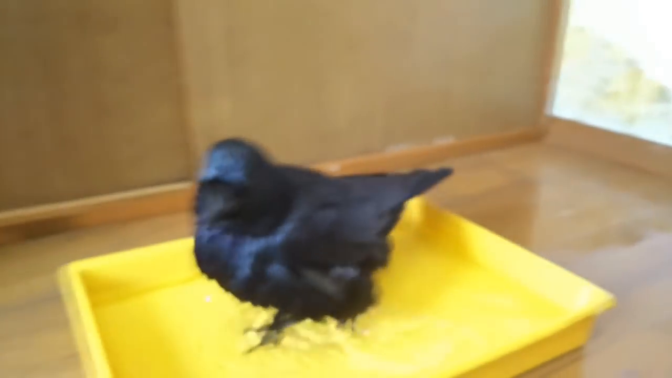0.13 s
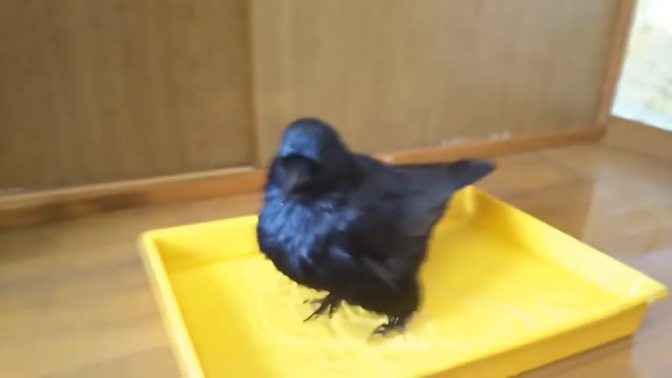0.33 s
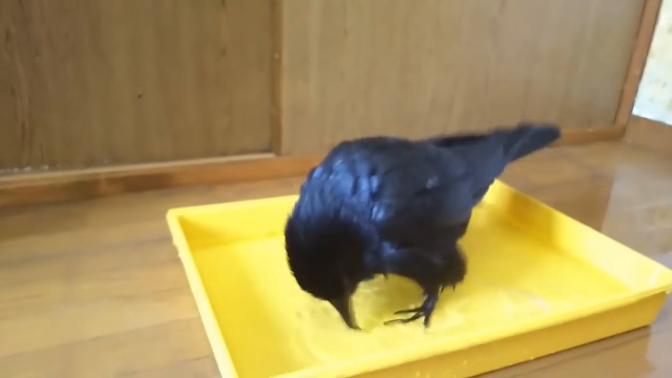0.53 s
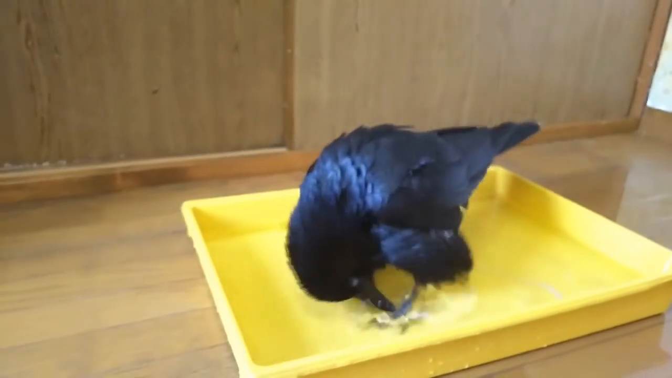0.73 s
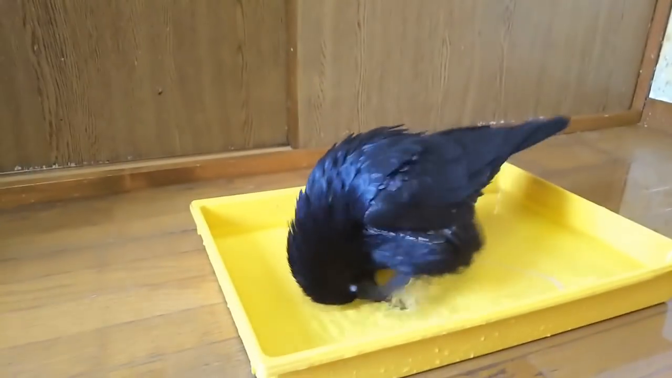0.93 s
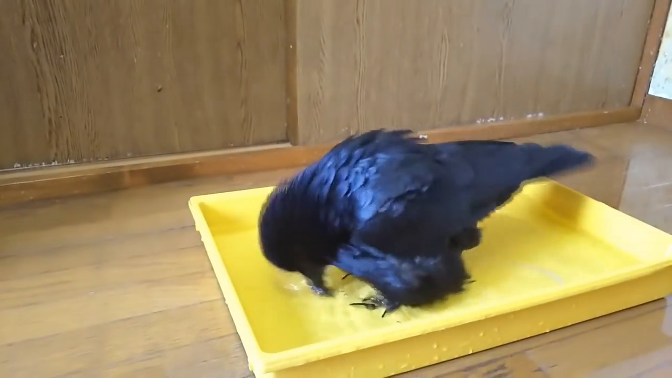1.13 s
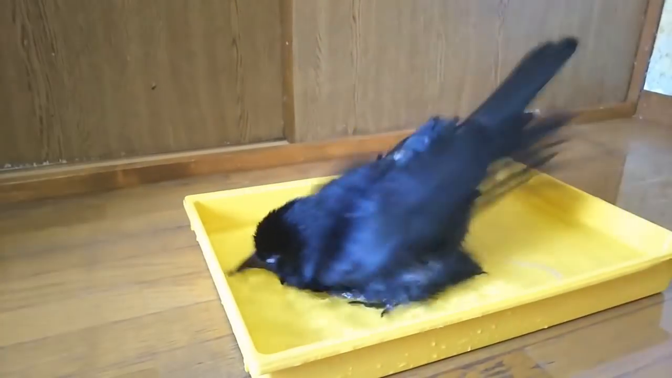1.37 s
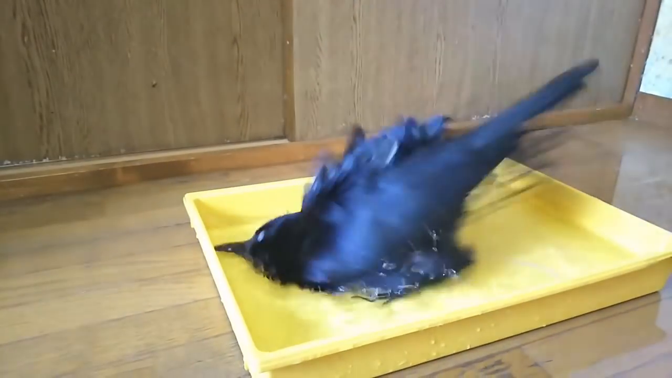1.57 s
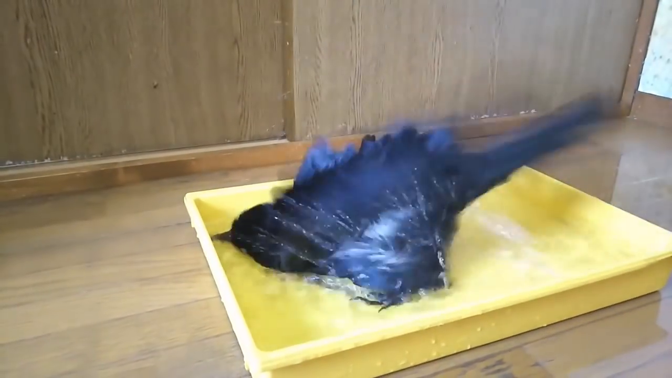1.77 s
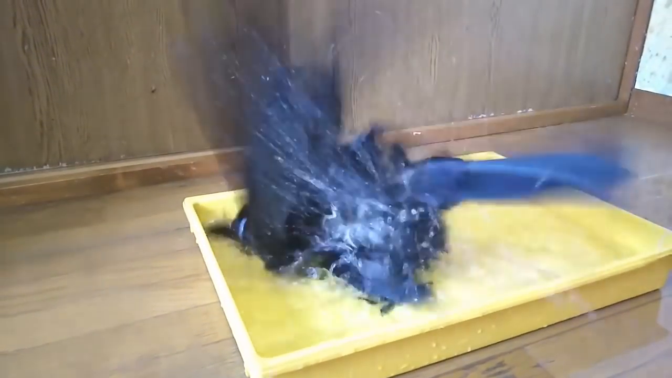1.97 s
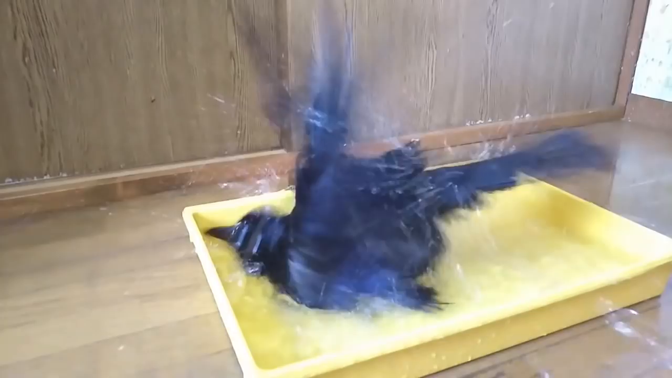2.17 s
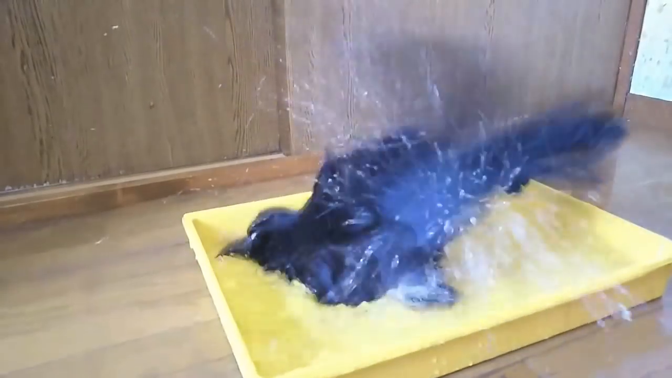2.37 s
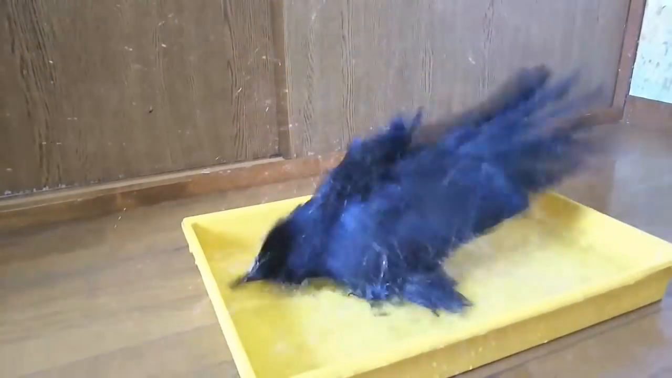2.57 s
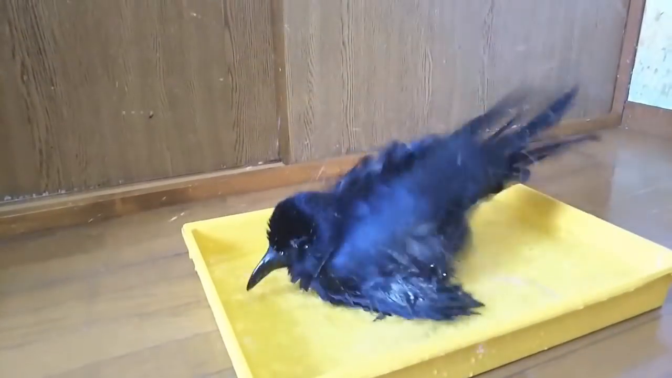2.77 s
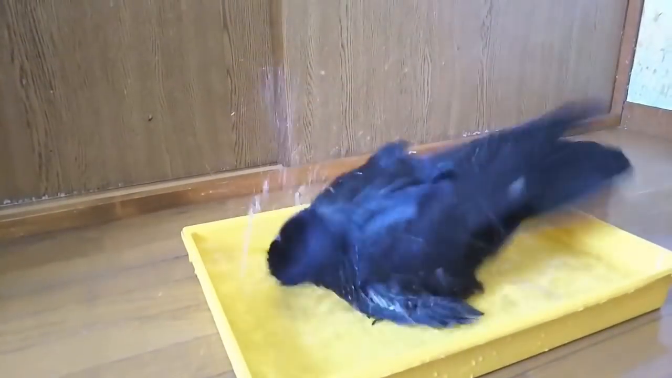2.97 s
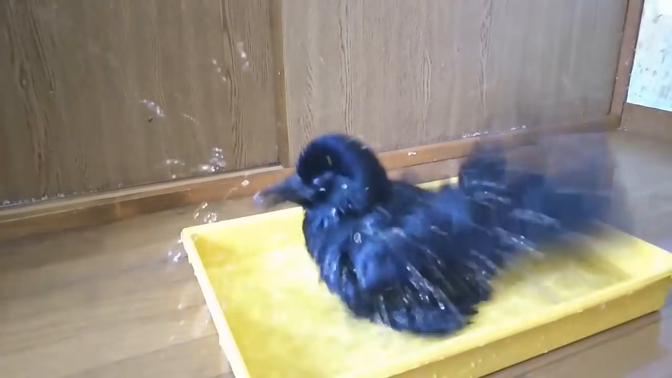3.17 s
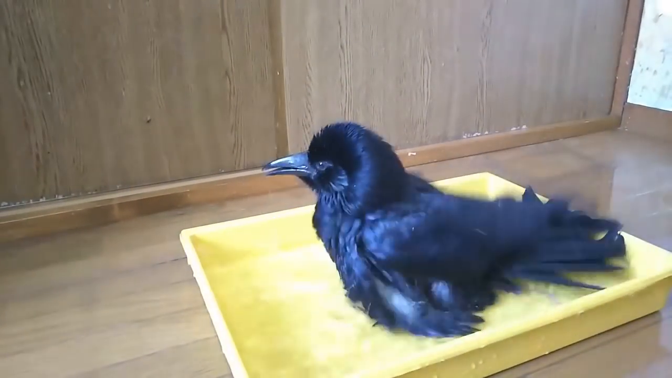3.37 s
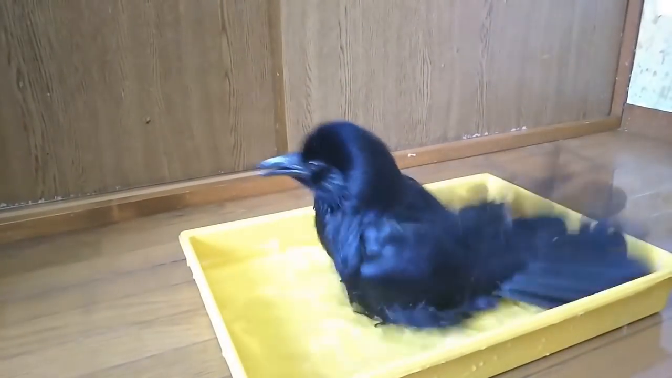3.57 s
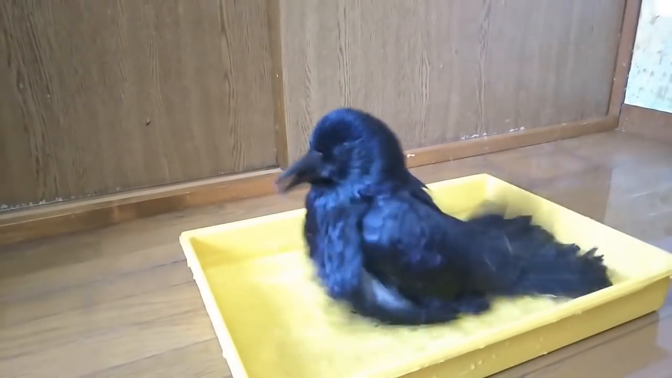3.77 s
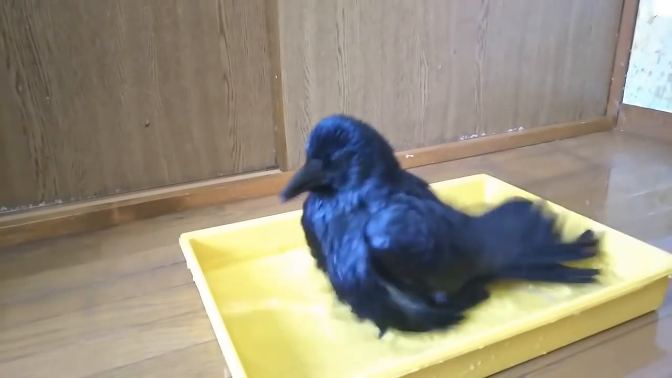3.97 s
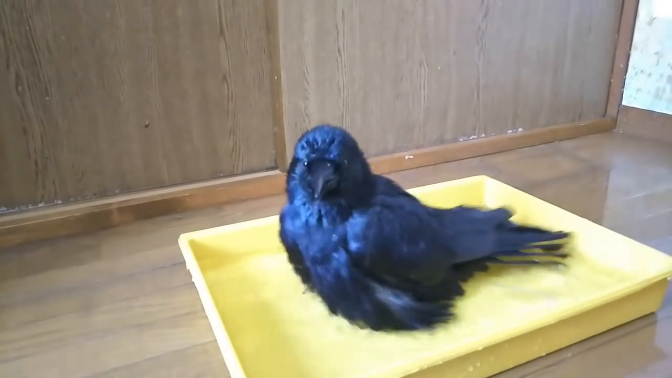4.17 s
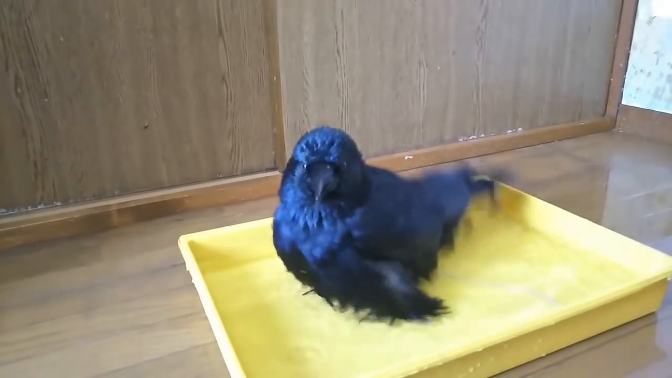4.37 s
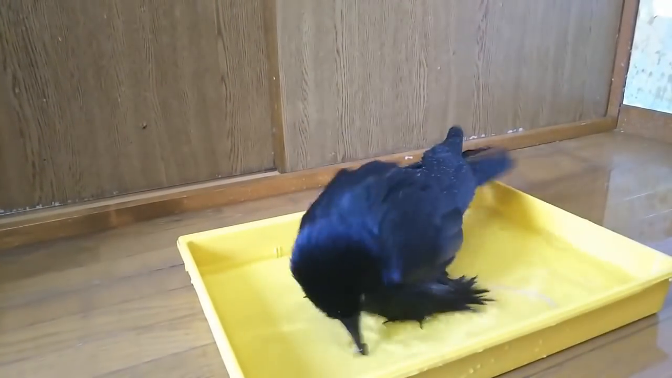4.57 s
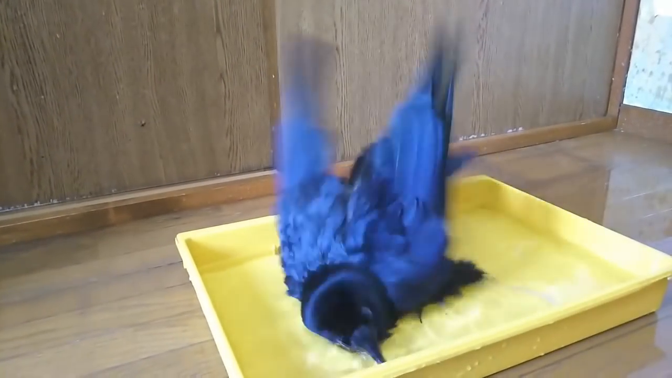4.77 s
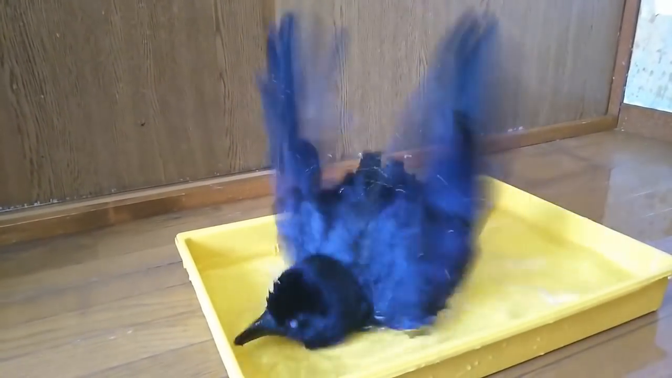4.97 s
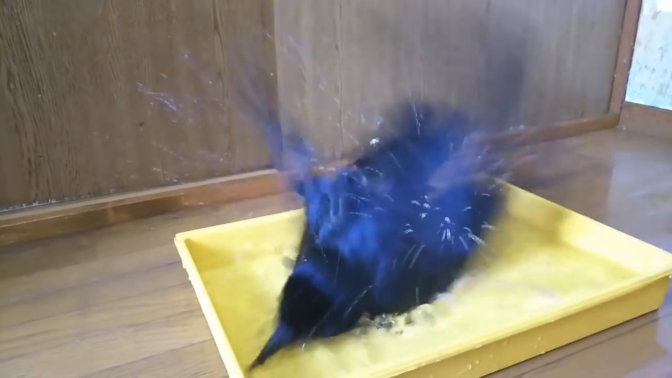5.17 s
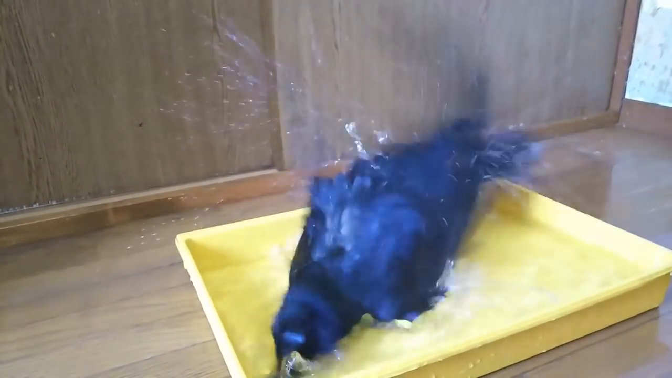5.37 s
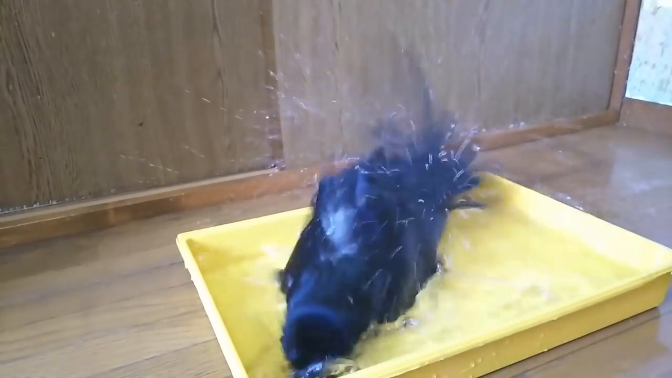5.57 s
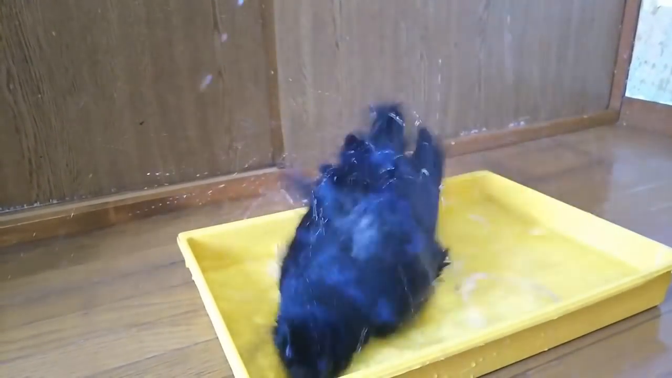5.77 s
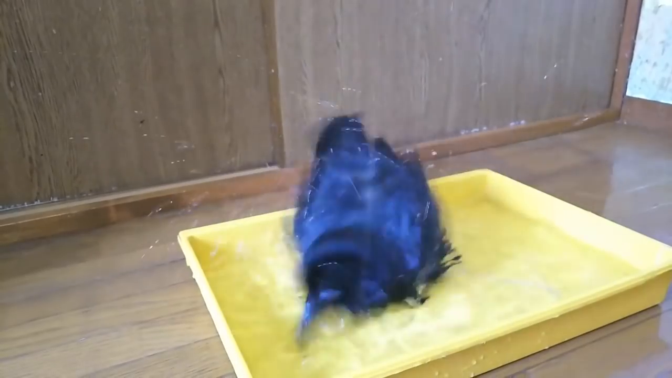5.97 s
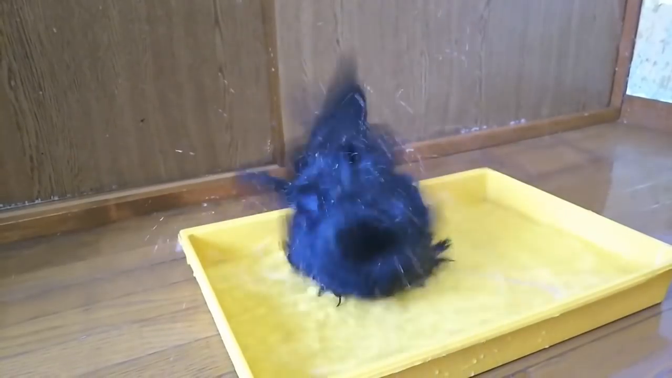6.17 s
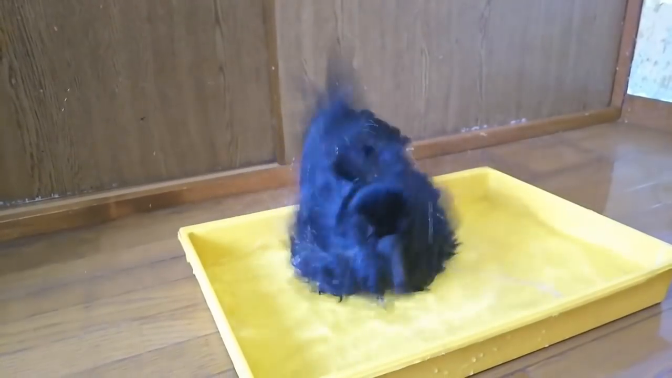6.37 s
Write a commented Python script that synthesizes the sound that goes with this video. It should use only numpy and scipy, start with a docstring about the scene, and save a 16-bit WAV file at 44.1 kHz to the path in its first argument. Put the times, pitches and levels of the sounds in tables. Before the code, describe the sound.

A large bird bathes in a shallow plastic tray indoors: sharp wet smacks, tray knocks, deep wing flutters, spattering spray and bubbles in two vigorous bouts.

```python
"""A crow-sized bird bathes in a shallow plastic tray on a wooden floor in a small bare room.
Feathers and beak smack water and tray: shaped noise bursts. Wing beats push air into the room's low modes
and thump the water. Random drops make spray and slosh, dying sines make the bubbles that ping and gurgle.
The room answers with a tail that swells late; a quiet hush lies below, all heard through two microphone ports."""
import sys
import numpy as np
from scipy import signal
from scipy.fft import rfft, irfft, next_fast_len
from scipy.io import wavfile
from scipy.ndimage import uniform_filter1d

SR = 44100
rng = np.random.default_rng(int(sys.argv[2]) if len(sys.argv) > 2 else 0)


def store_wav(level_fs):
    """Save 16-bit WAV to argv[1]."""
    pcm = np.round(np.clip(np.atleast_2d(level_fs), -1, 1) * 32767)
    wavfile.write(sys.argv[1], SR, pcm.T.astype(np.int16))


N = 282681

# Smacks on water and tray. Each row: start in seconds, length in seconds, crack level in dB, crack centre in Hz,
# slap level in dB, tray knock level in dB, knock centre in Hz. Levels are relative peaks.
SMACKS = [(0.052, 0.0016, -24, 6600, -50, -62, 700), (0.088, 0.0018, -29, 4760, -31, -58, 700),
          (0.0894, 0.0042, -18, 7400, -48, -40, 820), (0.115, .002, -41, 7500, -56, -54, 700),
          (0.14, 0.0036, -12.5, 6640, -51, -45, 700), (.3416, 0.0027, -40, 6750, -52, -72, 700),
          (0.504, 0.0037, -34.5, 7600, -39.5, -61, 700), (0.515, 0.0033, -48, 8150, -45, -57, 700),
          (0.751, 0.0021, -60, 6040, -53, -44, 506), (0.856, 0.0019, -22, 8100, -34, -38, 585),
          (1.061, 0.0028, -31, 5000, -31, -32, 680), (1.1242, 0.0023, -6.5, 6860, -62, -34, 667),
          (1.392, 0.0023, -42, 6070, -48, -65, 700), (1.4237, 0.0036, -33, 6500, -44, -48, 700),
          (1.4689, 0.002, -19.5, 6450, -13, -10.5, 530), (1.6534, 0.0034, -52, 7580, -55, -28, 740),
          (1.835, 0.0028, -28.5, 6730, -28.5, -33, 350), (1.933, 0.0013, -16, 7200, -20, -20.5, 810),
          (2.279, .003, -18.5, 8500, -18, -37, 800), (2.2837, .003, -22, 8000, -33, -43, 800),
          (2.2855, .004, -18, 8000, -21.5, -38, 800), (2.543, 0.0034, -13, 8400, -15, -18.5, 744),
          (2.7254, 0.0072, -14, 8500, -15, -21.5, 850), (2.8797, 0.0034, -21, 7200, -20.5, -27, 744),
          (3.164, 0.0037, -16, 9900, -55, -70, 700), (3.413, 0.011, -35, 4970, -31.5, -65, 704),
          (3.48, 0.0038, -27.5, 7800, -24, -25, 866), (3.6072, 0.0078, -45, 7700, -28.5, -26, 915),
          (3.902, 0.0043, -23, 8000, -24, -23, 606), (4.104, 0.0014, -34, 5060, -29, -48, 700),
          (4.171, 0.0012, -11.5, 6800, -45, -49, 700), (4.231, 0.0049, -29.5, 7000, -52, -62, 700),
          (4.584, 0.0037, -42, 4960, -52, -70, 700), (4.595, 0.0015, -26, 9400, -55, -73, 700),
          (4.617, .005, -29, 8300, -33, -52, 700), (4.622, 0.0043, -30, 7900, -35, -43, 700),
          (4.726, 0.002, -24, 6800, -24, -17.5, 506), (4.8348, 0.0024, -34, 8500, -34, -26, 500),
          (4.995, 0.0023, -26, 7400, -43, -21.5, 580), (5.098, 0.0037, -29.5, 7950, -50, -61, 700),
          (5.1274, 0.0054, -20, 7250, -25, -21.5, 680), (5.283, 0.0036, -24.5, 7650, -52, -54, 700),
          (5.339, 0.00095, -43, 4960, -14, -14, 1080), (5.503, 0.0032, -25, 8340, -44, -32, 700),
          (5.546, 0.0052, -11.5, 7900, -18.5, -23, 700), (5.74, 0.0098, -22.5, 9200, -24.5, -42, 750),
          (5.801, 0.0037, -44, 7000, -47, -32, 600), (5.8522, 0.0012, -45, 6810, -36, -9.5, 695),
          (5.889, 0.003, -17, 8600, -30, -38, 550), (5.9, .003, -20, 8000, -27, -35, 700),
          (6.075, 0.006, -17.5, 8000, -39, -34, 695), (6.192, 0.0033, -27, 8000, -40, -38, 700)]
# Strokes of wings and body. Each row: start in seconds, deep push in dB, water thump in dB, thump centre in Hz,
# spray in dB. Levels are relative.
BEATS = [(0.0, -19.5, -30, 183, -75), (0.497, -42, -54, 221, -63), (.751, -42, -43, 343, -85),
         (0.857, -41, -45.5, 300, -42), (1.06, -73, -44, 300, -56), (1.121, -37, -40, 253, -33.5),
         (1.467, -61, -26, 404, -77), (1.641, -32, -35, 193, -45.5), (1.838, -56, -32.5, 228, -46),
         (1.934, -62, -40, 330, -59), (2.014, -21.5, -30.5, 204, -39), (2.18, -19, -31, 179, -33),
         (2.333, -24, -27.5, 145, -32.5), (2.384, -44, -42, 190, -33), (2.523, -19.5, -27, 204, -28.5),
         (2.685, -31, -33.5, 198, -44), (2.719, -25.5, -27.5, 250, -51), (2.865, -29, -31.5, 197, -37.5),
         (2.878, -62, -49, 300, -39), (3.039, -33, -40, 177, -43.5), (3.156, -29.5, -39, 166, -49),
         (3.29, -36, -48.5, 230, -42), (3.354, -42, -47.5, 230, -64), (3.412, -39, -62, 250, -47.5),
         (3.454, -40, -40, 326, -45), (3.585, -34, -36.5, 196, -43), (3.724, -34, -38, 256, -41.5),
         (3.899, -65, -34.5, 290, -37.5), (4.088, -56, -66, 200, -45), (4.236, -60, -53, 300, -42),
         (4.175, -57, -76, 180, -42.5), (4.266, -42, -37, 277, -63), (4.591, -44, -59, 240, -47),
         (4.726, -17, -28, 224, -70), (4.833, -60, -35.5, 288, -84), (4.997, -32, -36.5, 203, -42),
         (5.129, -24, -30.5, 193, -48.5), (5.174, -28, -35.5, 240, -36), (5.33, -21, -29.5, 179, -31.5),
         (5.515, -16.5, -34, 207, -38), (5.718, -22, -28.5, 161, -38), (5.735, -40, -44, 300, -60),
         (5.792, -55, -34.5, 220, -78), (5.832, -54, -34, 200, -74), (5.888, -26.5, -26, 228, -32.5),
         (6.072, -21.5, -29, 184, -41), (6.192, -57, -41, 226, -42), (6.212, -28.5, -37.5, 226, -44),
         (6.234, -57, -44, 395, -47)]


def gain_of(db):
    """dB to gain."""
    return 10 ** (np.asarray(db) / 20)


def evened(x):
    """Scales to rms 1."""
    return x / np.sqrt(np.mean(x ** 2) + 1e-20)


def read(points, hz):
    """Reads a table on a log-frequency axis."""
    f, value = np.transpose(points)
    return np.interp(np.log(hz + 1), np.log(f + 1), value)


def add(mix, s, sound):
    """Mixes a sound in at time s."""
    part = mix[max(round(s * SR), 0):][:len(sound)]
    part += sound[:len(part)]


def smoothed(x, size, axis=-1):
    """Two running means in a row."""
    return uniform_filter1d(uniform_filter1d(x, size=size, axis=axis), size=size, axis=axis)


def colour(x, points):
    """Applies a spectrum given in dB."""
    n = next_fast_len(x.shape[-1])
    gain = gain_of(read(points, np.fft.rfftfreq(n, 1 / SR)))
    return irfft(rfft(x, n) * gain, n)[..., :x.shape[-1]]


def resonate(x, hz, width):
    """A resonance of gain about 1: one complex pole, width in Hz."""
    r = np.exp(-np.pi * width / SR)
    return 2 * signal.lfilter([1 - r], [1, -r * np.exp(2j * np.pi * hz / SR)], x).real


def resonate_twice(x, hz, width):
    """Two equal resonances in a row, for steeper sides."""
    return resonate(resonate(x, hz, width), hz, width)


def flattened(x, size=40):
    """Evens out the coarse spectrum of a burst."""
    z = rfft(x)
    return irfft(z / np.sqrt(uniform_filter1d(abs(z) ** 2, size=size)))


def pair(a, b):
    """Two port signals, much alike in the bass and nearly unrelated in the treble."""
    # Each row: frequency in Hz, left-right likeness from 0 to 1.
    likeness = [(60, 0.77), (290, 0.72), (640, 0.7), (1400, 0.076)]
    n = next_fast_len(len(a))
    same = np.clip(read(likeness, np.fft.rfftfreq(n, 1 / SR)), 0, 1)
    right = same * rfft(a, n) + np.sqrt(1 - same ** 2) * rfft(b, n)
    return np.array([a, irfft(right, n)[:len(a)]])


def hush():
    """The quiet room: steady coloured noise at both ports."""
    # Each row: frequency in Hz, relative level in dB per Hz.
    hush_spectrum = [(18, -16), (30, 13), (328, -2.5), (624, -11), (691, -10), (2920, -14.5), (4750, -19),
                     (10000, -32), (14000, -31), (14600, -60)]
    level_db = -51  # rms, ahead of the overall colour
    return gain_of(level_db) * evened(colour(pair(*rng.standard_normal((2, N))), hush_spectrum))


def room(x, rise_s=.006, gap_s=.009):
    """Dense taps, weak at first, swell after a gap and die band by band.

    Three random tails take turns at a steady rate, so that no fixed ringing stands out."""
    # Strength of the room's answer. Each row: frequency in Hz, level in dB.
    echo_spectrum = [(150, 3), (400, -4), (1200, -4), (3000, 0), (9000, 2), (12500, -1), (14600, -35)]
    # Decay of the room. Each row: frequency in Hz, t60 in seconds.
    decay = [(100, 0.6), (400, 0.25), (1100, 0.34), (3000, 0.32), (8000, 0.32), (13000, 0.19)]
    x = colour(x, echo_spectrum)
    n, out = SR * 3 // 4, 0
    turn = np.arange(N) / SR * 4.3  # half turns, 4.3 a second
    for k in range(3):
        taps = rng.choice([-1., 1.], (2, n)) * (rng.random((2, n)) < .1)
        hz, t, z = signal.stft(pair(*taps), SR, nperseg=256)
        fading = z * gain_of(-60 * t / read(decay, hz)[:, None])
        tail = signal.istft(fading, SR, nperseg=256)[1][:, :n]
        tail *= np.clip((np.arange(n) / SR - gap_s) / rise_s, .3, 1)
        tail /= np.linalg.norm(tail, axis=1)[:, None]
        share = np.sqrt(2 / 3) * np.cos(np.pi * (turn + k / 3))  # the squares of the three add up to 1
        out = out + signal.fftconvolve((x * share)[None], tail, axes=1)[:, :N]
    return out


def surge(rise_s, fall_s):
    """A smooth rise and an exponential fall."""
    t = np.arange(SR // 4) / SR
    return np.sin(np.pi / 2 * np.minimum(t / rise_s, 1)) ** 2 * np.exp(-np.maximum(t - rise_s, 0) / fall_s)


def vigour():
    """Levels of spray and slosh in dB: a slow bed, a swell for each stroke and a quick gush for each smack."""
    # Drops still falling between strokes. Each row: time in seconds, relative spray level in dB.
    falling = [(0.0, -39.5), (0.1, -57.5), (0.32, -61), (1.02, -68.5), (1.5, -57), (1.88, -50),
               (2.05, -37.5), (2.77, -40), (3.05, -51.5), (3.57, -49.5), (3.93, -56), (4.4, -67),
               (4.7, -65), (5.19, -48.5), (5.529, -40.5), (6.07, -40.5), (6.27, -53), (6.41, -46)]
    bed_slosh_db = -8.0  # relative to the falling drops
    stroke_slosh_db = -11.5  # relative to the thump of a stroke
    knock_slosh_db, slap_slosh_db, slap_spray_db = -23, -28, -27  # relative to the knock or slap of a smack
    spray = gain_of(np.interp(np.arange(N) / SR, *np.transpose(falling)))
    slosh = spray * gain_of(bed_slosh_db)
    swell = surge(rise_s=0.013, fall_s=0.028)
    gush = surge(rise_s=0.00072, fall_s=0.023)
    for s, _, thump_db, _, spray_db in BEATS:
        add(spray, s, gain_of(spray_db) * swell)
        add(slosh, s, gain_of(thump_db + stroke_slosh_db) * swell)
    for s, *_, slap_db, knock_db, _hz in SMACKS:
        add(spray, s, gain_of(slap_db + slap_spray_db) * gush)
        add(slosh, s, (gain_of(knock_db + knock_slosh_db) + gain_of(slap_db + slap_slosh_db)) * gush)
    return 20 * np.log10(spray), 20 * np.log10(slosh)


def patchy(x, depth_db=2, size=9):
    """Lumps of water of different size colour the sound in short patches."""
    z = signal.stft(x, nperseg=256)[2]
    patches = uniform_filter1d(rng.standard_normal(z.shape[-2:]), size=5, axis=0)  # across frequency
    patches = uniform_filter1d(patches, size=size, axis=1)  # across time
    return signal.istft(z * gain_of(depth_db * evened(patches)), nperseg=256)[1][..., :N]


def patter(points, per_s, spread_db, level_db):
    """Random drops of uneven size landing in clumps."""
    size = gain_of(spread_db * np.minimum(rng.exponential(1, N), 5)) * rng.choice([-1, 1], N)
    clumps = gain_of(1.7 * evened(uniform_filter1d(rng.standard_normal(N), 500)))
    drops = size * (rng.random(N) < per_s / SR) * clumps
    return evened(patchy(colour(drops, points))) * gain_of(level_db)


def ping(hz, t60, rise=0.19, wobble=0):
    """A bubble: a dying sine, its pitch climbing towards the surface, or sinking if rise is negative."""
    t = np.arange(3000) / SR
    turns = hz * t * (1 + rise * (t / t60 - .25)) + wobble
    return gain_of(-60 * t / t60) * np.minimum(t / 0.00087, 1) * np.sin(2 * np.pi * turns)


def gurgle(level_db, per_s=450):
    """Many small bubbles of random size under the slosh."""
    uneven_db = 3.6 * np.minimum(rng.exponential(1, N), 1.5)
    pops = gain_of(level_db + uneven_db) * (rng.random(N) < per_s / SR)
    sizes = np.geomspace(500, 5500, num=18)  # pitches in Hz
    size = rng.integers(0, len(sizes), N)
    return sum(signal.oaconvolve(pops * (size == k), ping(hz, 14 / hz))[:N] for k, hz in enumerate(sizes))


def water():
    """Fine spray at several places round the tray, thrown in common lumps, and heavy slosh with its bubbles."""
    # Spectra of the two. Each row: frequency in Hz, relative level in dB per Hz.
    spray_spectrum = [(470, -108), (800, 0), (1710, -2.5), (2470, -2), (3440, -5), (8120, -2.5),
                      (13800, -2), (14400, -30), (15000, -62)]
    slosh_spectrum = [(60, -30), (150, 4.5), (400, 6), (1000, 3.5), (2500, -12), (3600, -19), (6000, -70)]
    # One entry for each place that spray lands: lag of the left port in samples.
    lags = [-22, -11, 3, 12]
    lump_db, clump_db, gurgle_db = 3, 2, 6  # unevenness by patch and by moment; bubbles relative to slosh
    spray_db, slosh_db = vigour()
    places = [patter(spray_spectrum, per_s=700, spread_db=2.0, level_db=0) for _ in lags]
    left = sum(np.roll(place, lag) for place, lag in zip(places, lags))
    spray = np.array([left, sum(places)])
    clumps_db = clump_db * evened(smoothed(rng.standard_normal(N), size=400))
    spray = evened(patchy(spray, lump_db, size=18) * gain_of(clumps_db))
    spray = gain_of(spray_db + 3.0) * spray
    slosh = patter(slosh_spectrum, per_s=910, spread_db=3.0, level_db=slosh_db)
    return spray, slosh + gurgle(slosh_db + gurgle_db)


def bubbles():
    """The large bubbles that stand out, each wavering in level and phase as it breaks up."""
    # Air pockets closing in the water. Each row: start in seconds, relative level in dB, pitch in Hz,
    # t60 in seconds, rise over half a t60 as a share of the pitch.
    pockets = [(.1435, -20, 3600, 0.0059, -1.3), (.1495, -33, 3180, 0.02, -0.21),
               (0.491, -40.5, 1190, 0.047, 0.17), (.758, -32.5, 550, 0.032, 0.98),
               (.525, -41.5, 2410, 0.037, 0.23), (1.162, -20.5, 987, 0.021, -0.71),
               (1.468, -17, 2900, 0.0092, 0.26), (1.472, -13, 1810, .012, 1),
               (1.476, -26, 428, 0.047, -0.31), (1.492, -29, 545, 0.04, -0.074),
               (1.654, -30, 850, 0.04, 0.036), (1.686, -34, 1980, 0.034, -0.21),
               (1.842, -21, 244, 0.058, .05), (2.155, -17.5, 1340, 0.065, 0.33),
               (2.372, -18.5, 740, 0.042, 0.69), (2.538, -12, 1930, 0.02, -0.44),
               (4.09, -23.5, 2144, 0.024, 0.68), (4.095, -26, 1150, 0.033, 0.23),
               (4.122, -29, 5100, 0.03, -0.1), (4.137, -30, 5140, 0.032, 0.055),
               (4.147, -36, 5200, .03, .05), (4.232, -36, 3760, 0.033, -0.42),
               (4.276, -38, 950, 0.055, 0.17), (4.288, -39, 720, 0.025, 0.11),
               (4.301, -28.5, 880, 0.03, -0.37), (4.307, -33, 800, 0.034, .2),
               (4.32, -39, 810, 0.027, 0.54), (4.333, -32.5, 765, 0.029, 0.5),
               (4.565, -39, 2400, .02, 0.018), (4.614, -45, 2120, .02, -0.046),
               (4.597, -39, 1300, 0.032, -0.32), (4.624, -33, 1500, 0.047, -0.38),
               (4.736, -13, 415, 0.042, -0.64), (4.752, -26, 1150, 0.013, 0.29),
               (4.77, -27, 980, 0.017, 0.1), (4.79, -36, 810, 0.018, 0.019),
               (4.767, -49, 2500, 0.013, -0.44), (5.476, -22, 764, 0.018, -0.1),
               (5.573, -22.5, 1210, 0.019, -0.18), (5.908, -24, 2140, 0.022, -0.24),
               (6.288, -29, 1150, 0.046, 0.15), (2.305, -24, 2050, .02, .1),
               (2.374, -23, 2460, 0.025, -0.26), (2.415, -26, 2620, .015, -0.019),
               (2.77, -19, 1260, 0.033, .2), (5.195, -30, 2550, 0.018, .05), (6.095, -35, 1960, .02, .05)]
    wobble_db, wobble_turns = 1.5, 0.09
    out = np.zeros(N)
    for s, db, hz, t60, rise in pockets:
        level, phase = (evened(smoothed(v, size=90)) for v in rng.standard_normal((2, 3000)))
        dips_db = wobble_db * np.minimum(level - level[40], 0)
        add(out, s, gain_of(db + dips_db) * ping(hz, t60, rise, wobble_turns * phase))
    return out


def wings():
    """Each stroke pushes the room's air slowly and gives the water a ragged thump; both excite low modes."""
    # Air of the room. Each row: frequency in Hz, width in Hz, level in dB.
    air_modes = [(70.2, 6.8, 16.5), (104, 17.3, 22.5)]
    # Floor boards and room. Each row: frequency in Hz, width in Hz, level in dB.
    floor_modes = [(144.6, 11.8, 25.5), (161.5, 4.6, 29), (189, 7, 6.5), (250, 5.6, 17.5), (404, 7.3, 19),
                   (550, 18, 16)]
    push_lag_s = 0.014
    push, thump, t = np.zeros(N), np.zeros(N), np.arange(3000) / SR
    puff = np.sin(2 * np.pi * t * 70) * t / 0.011 * np.exp(-t / 0.0087)
    for s, push_db, thump_db, thump_hz, _ in BEATS:
        add(push, s + push_lag_s, gain_of(push_db) * puff)
        ragged = flattened(rng.standard_normal(len(t)) * t * np.exp(-t / 0.0088), size=4)
        ragged = resonate_twice(ragged, thump_hz, 1.72 * thump_hz)
        ragged *= 0.69 / abs(ragged).max()
        add(thump, s, gain_of(thump_db) * ragged * np.exp(-(t / 0.036) ** 4))
    deep = sum(gain_of(db) * resonate(push, hz, width) for hz, width, db in air_modes)
    body = sum(gain_of(db) * resonate(thump, hz, width) for hz, width, db in floor_modes)
    return deep + body + 0.26 * push, 2.21 * thump


def smacks():
    """A burst of evenly coloured noise heard as a bright crack, a longer wet slap and a knock that rings the tray."""
    # Ringing of the plastic tray. Each row: frequency in Hz, relative level in dB, t60 in seconds.
    tray_modes = [(245, -0.5, 0.087), (426, 7.5, 0.044), (483, 12.5, 0.036), (584, 10, 0.026),
                  (797, 10.5, 0.048), (914, 11, 0.088), (1174, 13.5, 0.088), (1370, 22.5, 0.023),
                  (1696, 14, 0.045)]
    slap_longer = 2.3  # decay time of the slap, in smack lengths
    slap_top_hz, tick_db, fade_s = 3600, -21, 0.022
    out, t = np.zeros((2, N)), np.arange(4096) / SR
    ring = sum(gain_of(db - 60 * t / t60) * np.sin(2 * np.pi * hz * t) for hz, db, t60 in tray_modes)
    dull = signal.butter(2, slap_top_hz, fs=SR, output="sos")
    tick = gain_of(tick_db) * np.diff(t == 0, prepend=0, axis=0)  # a thin click opens the crack
    for s, length, crack_db, hz, slap_db, knock_db, knock_hz in SMACKS:
        noise = rng.standard_normal(len(t) + 1)
        burst = flattened(noise[1:] * np.exp(-(t / (1.69 * length)) ** 2) + 9 * (t == 0))
        wet = flattened(noise[1:] * np.exp(-t / (slap_longer * length)) + 5.6 * (t == 0))
        crack = resonate_twice(burst, hz, 0.67 * hz)
        crack = signal.sosfilt(signal.butter(4, .68 * hz, "high", fs=SR, output="sos"), crack)
        crack = crack / abs(crack).max() + tick
        slap = signal.sosfilt(dull, resonate_twice(wet, 1710, 2300))
        rung = signal.fftconvolve(burst, ring)[:len(t)] / 60 + burst
        knock = resonate(resonate(rung, knock_hz, 1.1 * knock_hz), knock_hz, 1.8 * knock_hz)
        parts = (crack_db, crack), (slap_db, slap), (knock_db, knock)
        hit = sum(gain_of(db) * part / abs(part).max() for db, part in parts)
        hit *= np.exp(-(t / fade_s) ** 4)
        add(out[0], s - .0002 + .00025 * noise[0], hit)  # each at its own spot, most nearer the left port
        add(out[1], s, hit)
    return out


def scene():
    """Direct sound, mostly reaching the left port first, plus room, low modes and hush."""
    boom, thump = wings()
    spray, slosh = water()
    hits, pops = smacks(), bubbles()
    bird = pops + slosh + thump
    direct = hits + spray + np.array([np.roll(bird, -11), bird])  # left port leads by 11 samples
    to_room = hits[1] + gain_of(-0.5) * spray[1] + slosh + thump + gain_of(-1.5) * pops
    return gain_of(4.5) * direct + gain_of(2.0) * room(to_room) + boom + hush()


def record(dry):
    """Overall colour, unequal ports, then the band limit."""
    # Overall colour: a notch near 10 kHz and a steep fall in the top treble.
    # Each row: frequency in Hz, level in dB.
    overall_colour = [(30, -34), (60, -8), (5000, 1.5), (8300, 0), (9400, -2), (10050, -15), (10700, -8.5),
                      (13500, -15), (14400, -17), (16000, -41)]
    # Left port over right port. Each row: frequency in Hz, level difference in dB.
    lean = [(60, 0.5), (110, 3), (200, -0.5), (380, 2.5), (700, 1), (1290, 0), (2380, -1), (4400, 0),
            (8120, -1.5), (15000, 16)]
    edge_hz = 16450
    heard = colour(dry, overall_colour)
    left = colour(heard[0], [(hz, db / 2) for hz, db in lean])
    right = colour(heard[1], [(hz, -db / 2) for hz, db in lean])
    band = signal.firwin(511, edge_hz, window=("kaiser", 9), fs=SR)
    return signal.oaconvolve(np.array([left, right]), band[None], "same")


dry = scene()
out = record(dry)
store_wav(out)
```